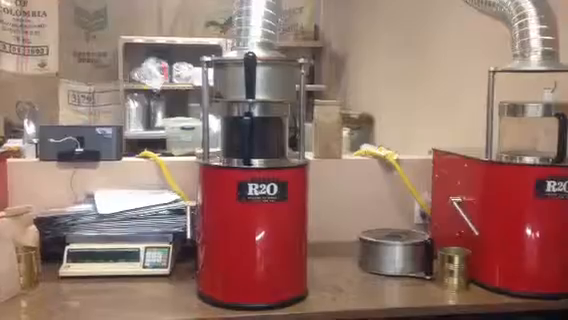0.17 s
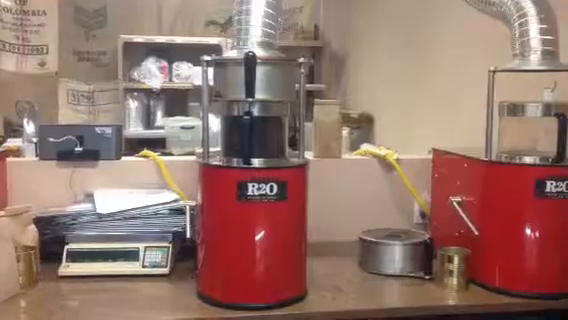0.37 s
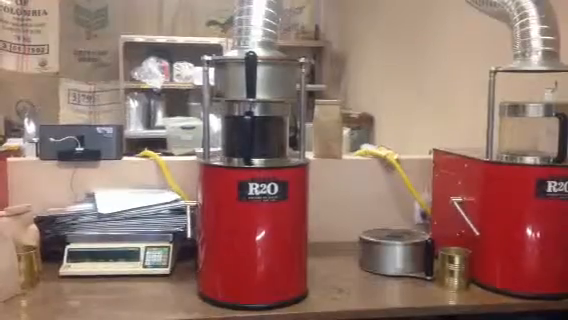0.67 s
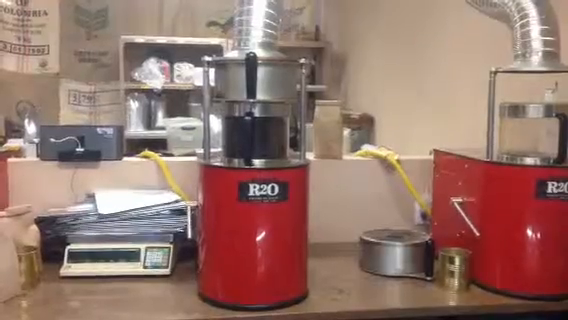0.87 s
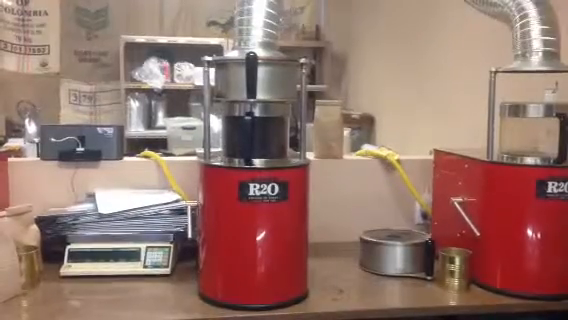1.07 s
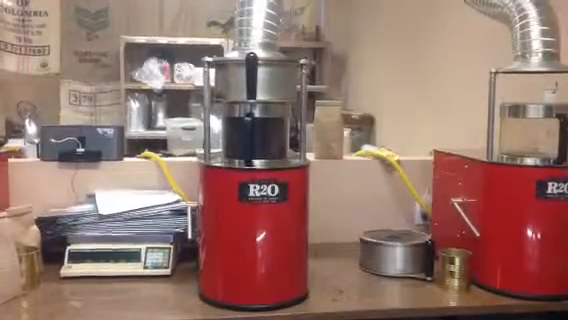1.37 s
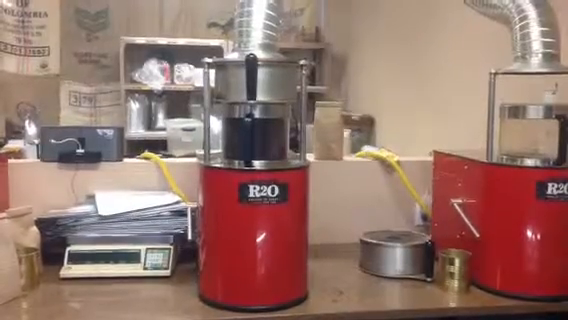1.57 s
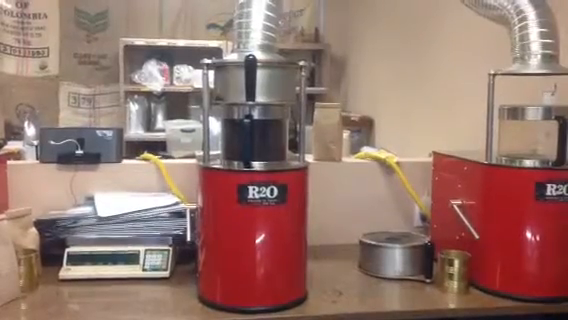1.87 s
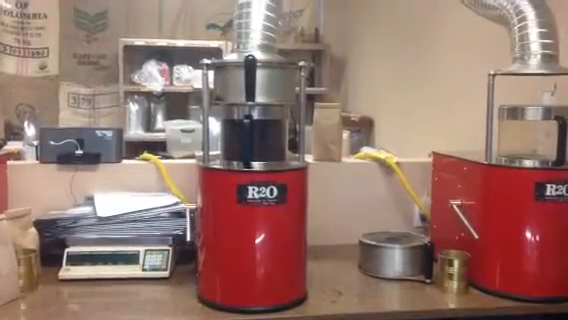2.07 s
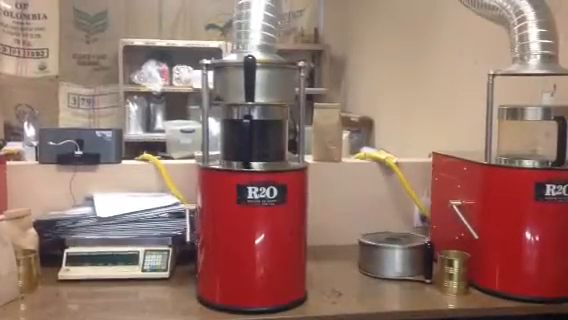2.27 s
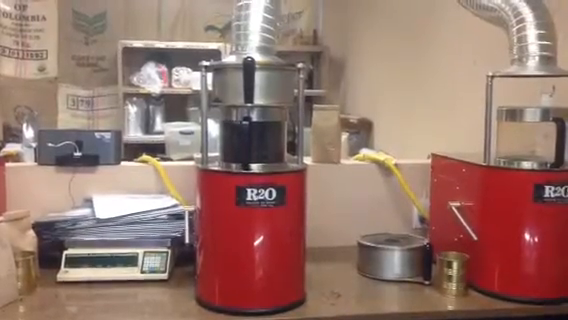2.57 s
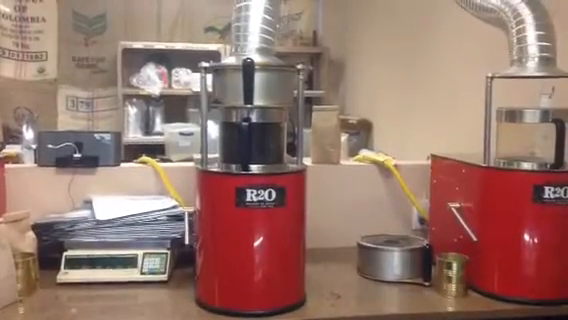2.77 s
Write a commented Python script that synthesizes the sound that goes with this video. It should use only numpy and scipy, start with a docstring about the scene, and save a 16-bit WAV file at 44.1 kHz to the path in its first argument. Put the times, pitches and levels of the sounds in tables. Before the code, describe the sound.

A small coffee roaster runs continuously in a room: low fan rumble, rushing air, thin wavering motor whine, and beans hissing in pulses in the steel drum; one dry tick, then a brief clatter near the end, close mono.

```python
"""Indoors, a small coffee roaster runs, heard in mono: filtered noise gives the fan's rumble in its duct
and the rush of air, and wandering sinusoids give the motor's whine, hum and faint tones.
A dry tick (pulse and knock) and a short clatter (random clicks) sound nearby.
Beans slide in the turning steel drum: dense clicks hiss and excite the drum's modes, swelling about
four times a second as the beans pour off a vane."""
import sys
import numpy as np
from scipy import signal
from scipy.fft import rfft, irfft, next_fast_len
from scipy.io import wavfile

SR = 44100
rng = np.random.default_rng(int(sys.argv[2]) if len(sys.argv) > 2 else 0)


def store_wav(level_fs):
    """Save 16-bit WAV to argv[1]."""
    pcm = np.round(np.clip(np.atleast_2d(level_fs), -1, 1) * 32767)
    wavfile.write(sys.argv[1], SR, pcm.T.astype(np.int16))


N = 129213  # length in samples

# Early echoes from the bench, wall and shelves: delay t/s, level/dB
EARLY_ECHOES = [(.0023, -27), (.0051, -21.5), (.0079, -18), (.0127, -14.5), (0.0197, -18)]
# Faint room decay after a hit: starting level, time to fall by 60 dB
ROOM_DB, ROOM_T60_S = -18, .22

# Spectrum of the fan rumble in the duct: f/Hz, relative level/dB (per Hz)
RUMBLE_SPECTRUM = [(20, -31), (40, -40), (68, -20.5), (85, -11.5), (120, -11), (150, -7), (200, 1),
                   (245, -0.5), (290, -0.5), (325, -8.5), (390, -25), (460, -33.5), (700, -41)]
# Course of the rumble, used relative to the mean of its points: t/s, level/dB
RUMBLE_SWELL_COURSE = [(.12, -36.5), (.18, -35.5), (.45, -35), (.88, -36), (1.1, -34), (1.6, -33),
                       (1.95, -34), (2.45, -35.5), (2.92, -35)]
# Duct resonances: f/Hz, bandwidth f/Hz, relative level/dB
DUCT_MODES = [(154, 8, 0), (198, 12, 0), (234, 8, 1), (255, 10, 0), (282, 10, 0), (333, 14, -11),
              (362, 14, -11), (395, 10, -10), (585, 18, -16)]
RUMBLE_DB, DUCT_DB = -36, -44.5
RUMBLE_FLUTTER_DB, RUMBLE_FLUTTER_RATE_HZ = 1.8, 22

# Spectrum of the rushing air: f/Hz, relative level/dB (per Hz)
AIR_SPECTRUM = [(300, -1), (480, 2.5), (720, -0.5), (1250, 1.5), (1700, -1), (1950, 2), (2130, -5),
                (3000, -3), (6000, -7.5), (10000, -21), (15000, -53)]
# Blower housing resonances: f/Hz, bandwidth f/Hz, relative level/dB
HOUSING_MODES = [(887, 25, -5), (1200, 35, -4), (1265, 40, -4), (1406, 20, -5), (1663, 20, -6),
                 (1812, 25, -3), (1866, 35, -2), (1945, 60, 2), (2235, 50, -7), (2368, 20, -7),
                 (2470, 90, -4)]
AIR_DB, HOUSING_DB = -43.5, -54
AIR_FLUTTER_DB, AIR_FLUTTER_RATE_HZ = 1.1, 67

# Course of the main motor whine: t/s, level/dB (rms before the waver)
WHINE_COURSE = [(.14, -51), (.35, -56), (.47, -48), (.75, -52.5), (1.1, -55.5), (1.3, -52), (1.7, -57),
                (1.9, -52), (2.06, -47.5), (2.3, -52), (2.5, -49), (2.9, -54.5)]
# Low hum and faint motor tones: mean f/Hz, rms level/dB
FAINT_TONES = [(59, -60.5), (2369, -65.5), (3162, -70), (3557, -67)]
WHINE_HZ, WHINE_WAVER_DB, WHINE_WAVER_RATE_HZ = 1581, 3, 16  # the mean frequency of the whine
SPEED_WANDER, SPEED_WANDER_RATE_HZ = .0014, 8.4  # spread as a fraction of the mean speed
TONE_WAVER_DB, TONE_WAVER_RATE_HZ = 5.5, 12

# One dry tick: onset, peak level of its pulse and the pulse's time constant
TICK_S, TICK_DB, TICK_DECAY_S = 2.4282, -17.5, .000042
KNOCK_HZ, KNOCK_DB, KNOCK_DECAY_S = 1100, -28.5, .0013
# Contacts of the clatter: onset t/s, level/dB, decay constant of the crunch t/s
CLATTER_CONTACTS = [(2.8864, -32.5, 0.0054), (2.8945, -33, 0.0021), (2.906, -39.5, 0.0079)]
# Spectrum of the clatter and of the room's answer to the tick: f/Hz, relative level/dB (per Hz)
CLATTER_SPECTRUM = [(300, -21), (700, -8), (1050, 4), (1450, -6), (2000, 1.5), (2500, -1.5), (3100, -3),
                    (4500, -6.5), (8000, -9.5), (11000, -19), (15000, -32)]

# Pours of beans off a drum vane: centre t/s, level/dB, Gaussian standard deviation t/s
BEAN_POURS = [(0.385, -3.5, 0.097), (0.594, -4.5, 0.064), (0.805, -3, 0.087), (1.03, -0.5, 0.039),
              (1.27, -3, 0.054), (1.566, -4, 0.066), (1.82, -2, 0.023), (2.055, -3.5, 0.079),
              (2.335, -2, 0.066), (2.614, 1.5, 0.042), (2.885, -1.5, 0.031)]
# Spectrum of bean contacts: f/Hz, relative level/dB (per Hz)
BEAN_SPECTRUM = [(1000, -1.5), (2500, -12), (4200, 4), (5400, -10), (6600, 4), (9200, 2.5), (10400, -2),
                 (12000, -1), (14800, -7.5), (16000, -58)]
# Steel drum modes: f/Hz, bandwidth f/Hz, relative level/dB
DRUM_MODES = [(4345, 130, 0), (4760, 100, -6), (5875, 75, 1), (7670, 110, -2.5), (8575, 45, 0),
              (9695, 60, -6), (11010, 75, -8), (11900, 150, -7.5), (14330, 55, -8.5), (14700, 120, -11)]
SLIDE_DB = -2.5  # steady sliding, on the same scale as the pours
BEANS_DB, DRUM_DB = -50.5, -55.5
CONTACTS_PER_S, CONTACT_SPREAD_DB = 9000, 2.5  # mean rate; mean of the excess dB before its cap

START_S, LOW_CUT_HZ, HIGH_CUT_HZ = .1197, 40, 15330


def from_db(db):
    """Logarithmic level: 20 dB is a tenfold amplitude."""
    return 10 ** (np.asarray(db) / 20)


def rms_one(x):
    """Power normalization: scale to unit root mean square."""
    return x / np.sqrt(np.mean(x ** 2) + 1e-20)


def drift(rate_hz):
    """Low-pass filtered noise: two equal poles leave a slow random course, zero mean and unit spread."""
    step = 40  # samples between points of the slow course
    settling = 2000
    r = np.exp(-2 * np.pi * rate_hz * step / SR)
    noise = rng.standard_normal(N // step + settling + 2)
    slow = signal.lfilter([1], [1, -2 * r, r * r], noise)[settling:]
    return np.interp(np.arange(N) / step, np.arange(len(slow)), rms_one(slow - slow.mean()))


def coloured(x, spectrum):
    """Linear filtering: multiply the Fourier spectrum by a gain curve over log frequency; rms 1."""
    hz, db = np.transpose(spectrum)
    size = next_fast_len(N)
    bins_hz = np.maximum(np.arange(size // 2 + 1) * SR / size, 1)
    gain = from_db(np.interp(np.log(bins_hz), np.log(hz), db))
    return rms_one(irfft(rfft(x, size) * gain, size)[:N])


def resonance(x, hz, width):
    """Driven damped oscillator: a pole pair whose bandwidth sets its damping; rms 1."""
    r = np.exp(-np.pi * width / SR)
    poles = [1, -2 * r * np.cos(2 * np.pi * hz / SR), r * r]
    return rms_one(signal.lfilter([1, 0, -1], poles, x))


def blown(modes):
    """Turbulent excitation: noise drives each mode, band-limited first to darken its far skirts."""
    out = 0
    for hz, width, db in modes:
        turbulence = resonance(rng.standard_normal(N), hz, hz / 2)
        out = out + from_db(db) * resonance(turbulence, hz, width)
    return out


def echoed(x):
    """Comb interference: delayed copies from nearby surfaces ripple a steady spectrum; rms 1."""
    reflections = sum(from_db(db) * np.roll(x, int(delay * SR)) for delay, db in EARLY_ECHOES)
    return rms_one(x + reflections)


def room_tail(age):
    """Reverberant decay: after a hit the room level falls linearly in dB."""
    return from_db(ROOM_DB - 60 * age / ROOM_T60_S)


def contacts():
    """Random impacts: independent clicks of either sign and uneven size occur at a mean rate."""
    excess_db = CONTACT_SPREAD_DB * np.minimum(rng.exponential(1, N), 5)
    sizes = from_db(excess_db) * rng.choice([-1, 1], N)
    return sizes * (rng.random(N) < CONTACTS_PER_S / SR)


def rumble(t):
    """Broadband flow noise in a duct: a low roar plus duct resonances, swelling and fluttering together."""
    s, db = np.transpose(RUMBLE_SWELL_COURSE)
    broad = from_db(RUMBLE_DB) * coloured(rng.standard_normal(N), RUMBLE_SPECTRUM)
    roar = broad + from_db(DUCT_DB) * blown(DUCT_MODES)
    swell_db = np.interp(t, s, db - db.mean())
    flutter_db = RUMBLE_FLUTTER_DB * drift(RUMBLE_FLUTTER_RATE_HZ)
    return roar * from_db(swell_db + flutter_db)


def air():
    """Turbulence noise: air rushes through the blower housing and excites its resonances."""
    hiss = coloured(echoed(rng.standard_normal(N)), AIR_SPECTRUM)
    rush = from_db(AIR_DB) * hiss + from_db(HOUSING_DB) * blown(HOUSING_MODES)
    return rush * from_db(AIR_FLUTTER_DB * drift(AIR_FLUTTER_RATE_HZ))


def motor(t):
    """Frequency and amplitude modulation: sinusoids share a wandering speed and waver separately in level."""
    # integrated relative speed, in seconds
    warped_time = np.cumsum(1 + SPEED_WANDER * drift(SPEED_WANDER_RATE_HZ)) / SR
    s, whine_db = np.transpose(WHINE_COURSE)
    level_db = np.interp(t, s, whine_db) + WHINE_WAVER_DB * drift(WHINE_WAVER_RATE_HZ)
    out = from_db(level_db) * rms_one(np.sin(2 * np.pi * WHINE_HZ * warped_time))
    for hz, db in FAINT_TONES:
        waver = from_db(TONE_WAVER_DB * drift(TONE_WAVER_RATE_HZ))
        out = out + from_db(db) * rms_one(np.sin(2 * np.pi * hz * warped_time) * waver)
    return out


def tick(t):
    """Impulsive contact: a sharp pulse, a rapidly damped knock and the room's answer."""
    age = np.maximum(t - TICK_S, 0)
    pulse = from_db(TICK_DB) * age / TICK_DECAY_S * np.exp(1 - age / TICK_DECAY_S)
    knock = np.sin(2 * np.pi * KNOCK_HZ * age) * np.exp(-age / KNOCK_DECAY_S)
    room = room_tail(age) * coloured(rng.standard_normal(N), CLATTER_SPECTRUM)
    # the room's answer is halved here
    return (t >= TICK_S) * (pulse + from_db(KNOCK_DB) * (knock + .5 * room))


def clatter(t):
    """Successive impacts: crunches with exponential decay and a faint room tail shape dense clicks."""
    level = 0
    for s, db, length in CLATTER_CONTACTS:
        age = np.maximum(t - s, 0)
        level = level + from_db(db) * (t >= s) * (np.exp(-age / length) + room_tail(age))
    return level * coloured(echoed(contacts()), CLATTER_SPECTRUM)


def beans(t):
    """Granular excitation of modes: bean contacts hiss and ring the steel drum, more with every pour."""
    # powers of the steady sliding and the pours add
    power = from_db(SLIDE_DB) ** 2
    for s, db, width in BEAN_POURS:
        power = power + from_db(db) ** 2 * np.exp(-.5 * ((t - s) / width) ** 2)
    flow = np.sqrt(power)
    hiss = from_db(BEANS_DB) * coloured(echoed(contacts()), BEAN_SPECTRUM)
    ring = sum(from_db(DRUM_DB + db) * resonance(contacts(), hz, width) for hz, width, db in DRUM_MODES)
    return flow * (hiss + ring)


def scene():
    """Linear superposition: the sources add, the same in both channels."""
    t = np.arange(N) / SR
    mono = rumble(t) + air() + motor(t) + tick(t) + clatter(t) + beans(t)
    return np.stack([mono, mono])


def record(dry):
    """Band limitation: after a short silence the sound cuts in, without deepest bass or extreme treble."""
    on = np.arange(N) / SR >= START_S
    low_cut = signal.butter(2, LOW_CUT_HZ, "high", fs=SR, output="sos")
    high_cut = signal.ellip(12, .1, 80, HIGH_CUT_HZ, fs=SR, output="sos")
    thin = signal.sosfilt(low_cut, dry * on + 1e-18)  # inaudible offset
    return signal.sosfilt(high_cut, thin)


dry = scene()
out = record(dry)
store_wav(out)
```